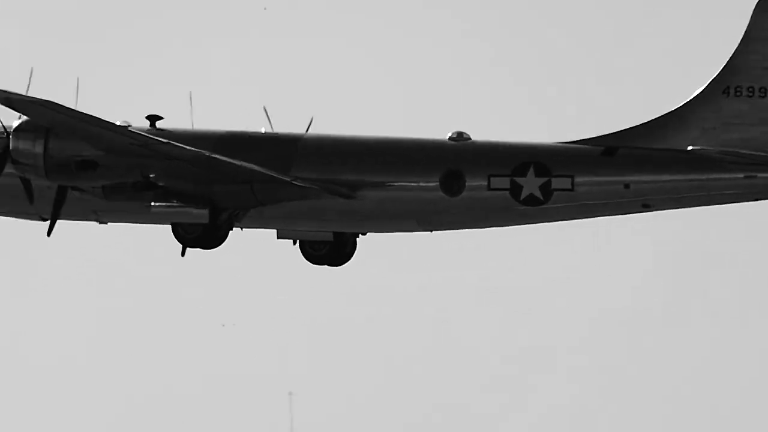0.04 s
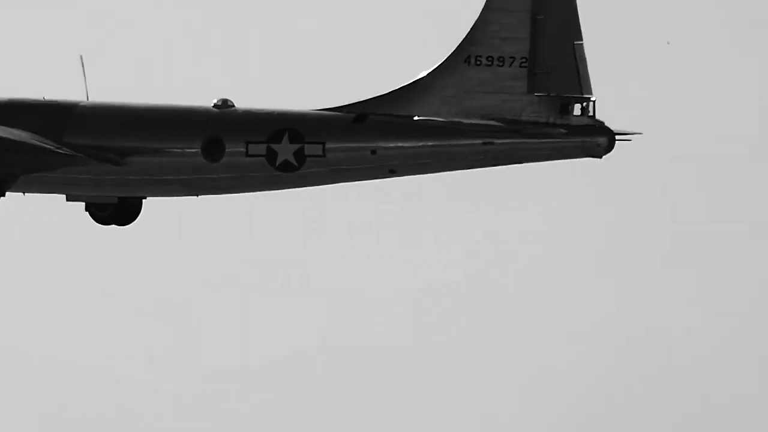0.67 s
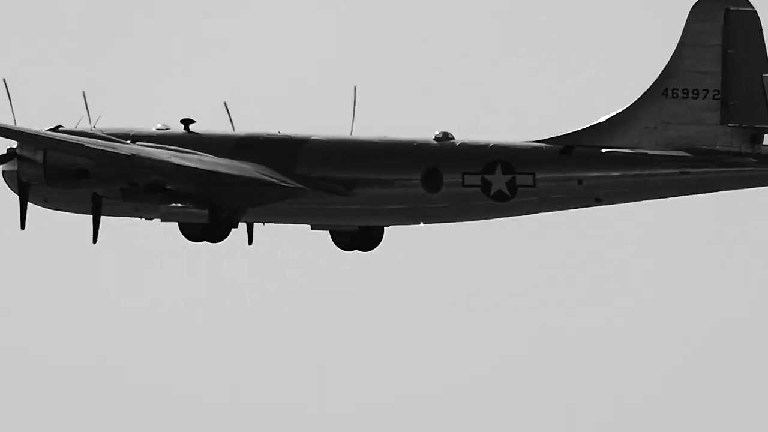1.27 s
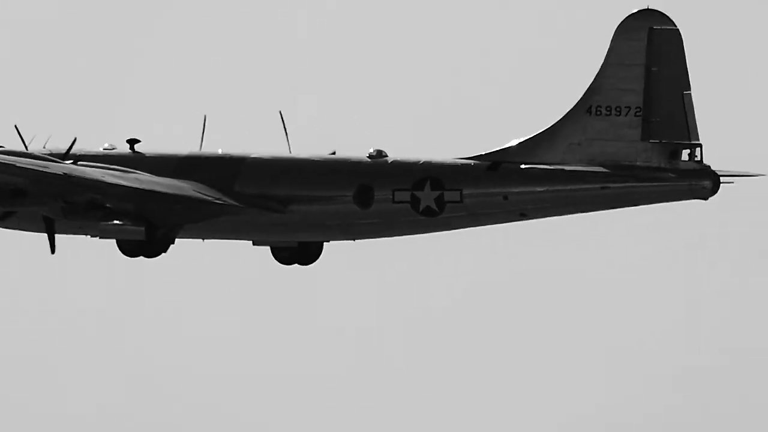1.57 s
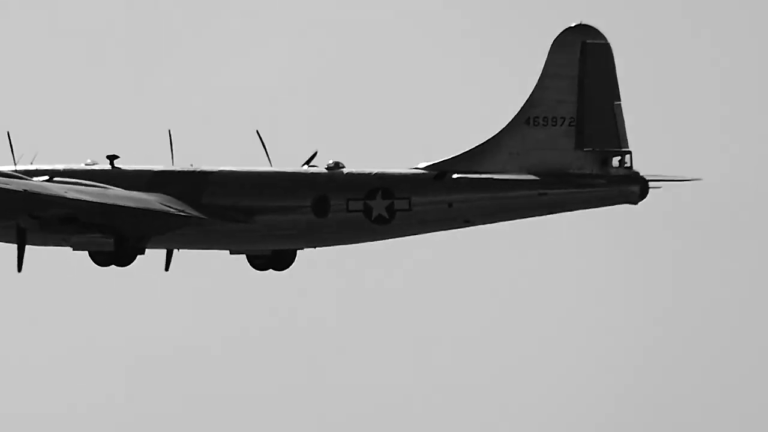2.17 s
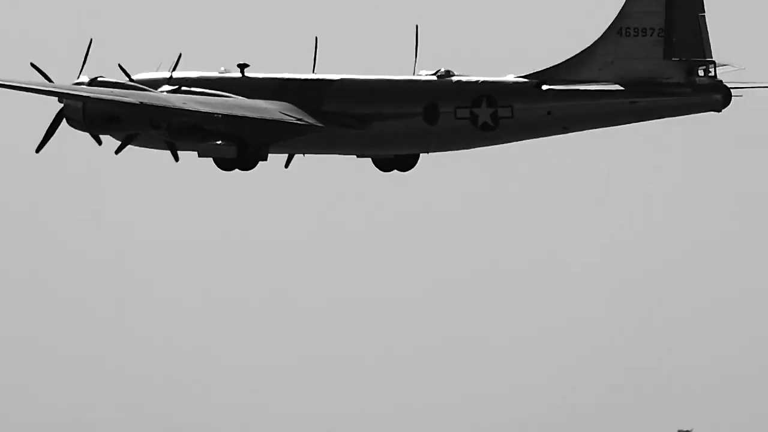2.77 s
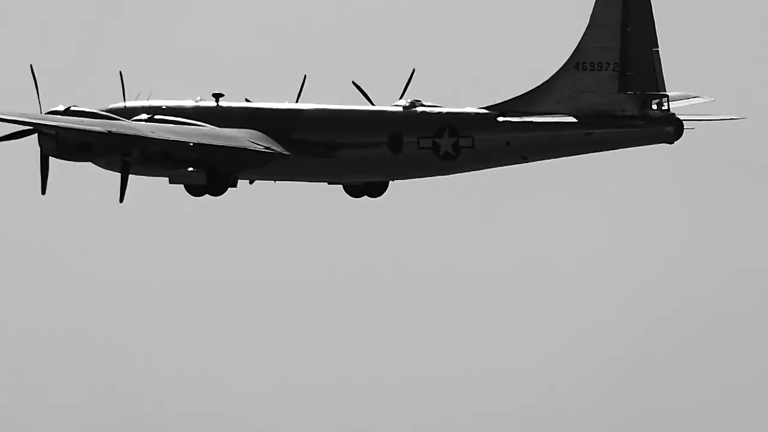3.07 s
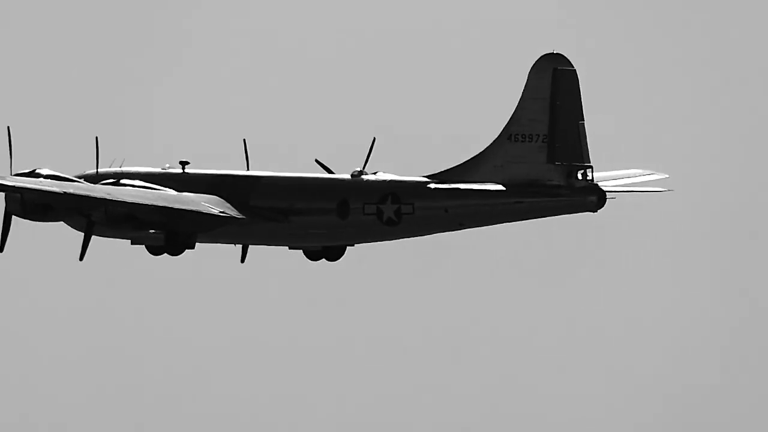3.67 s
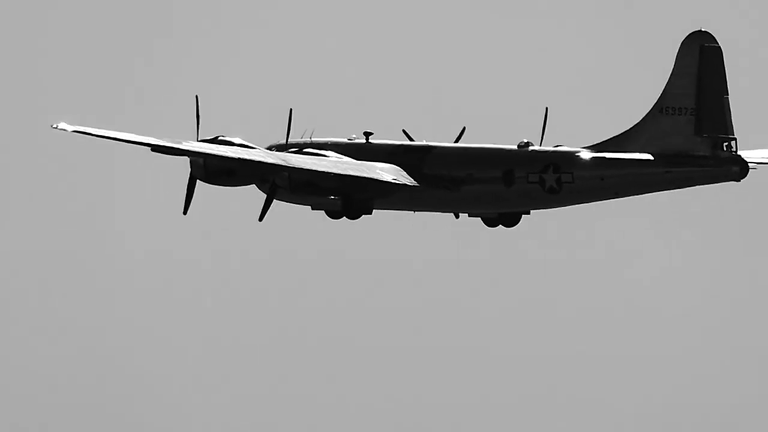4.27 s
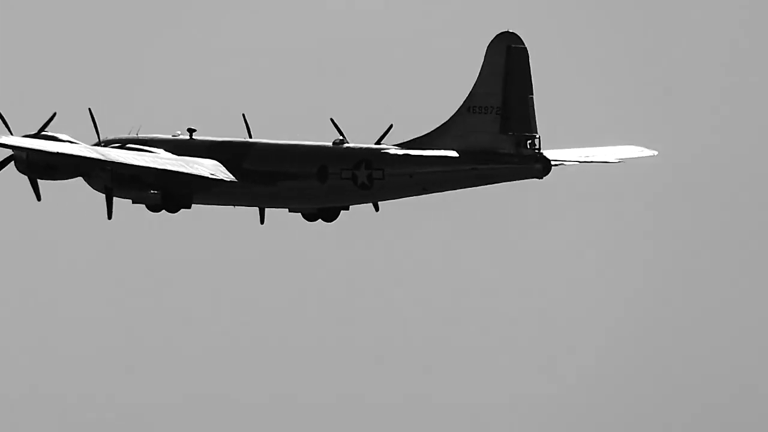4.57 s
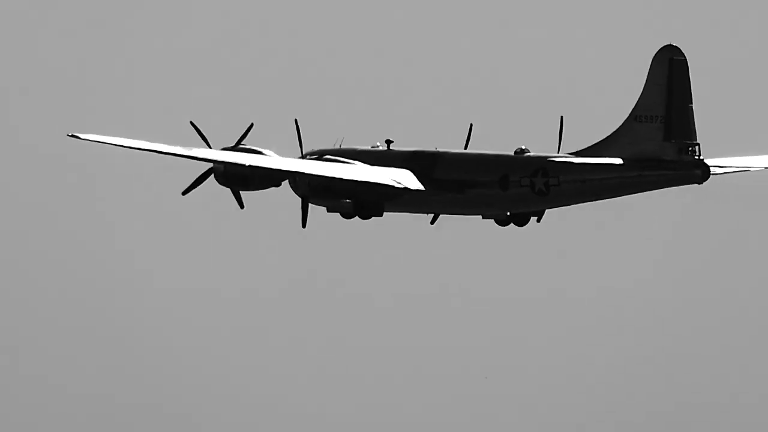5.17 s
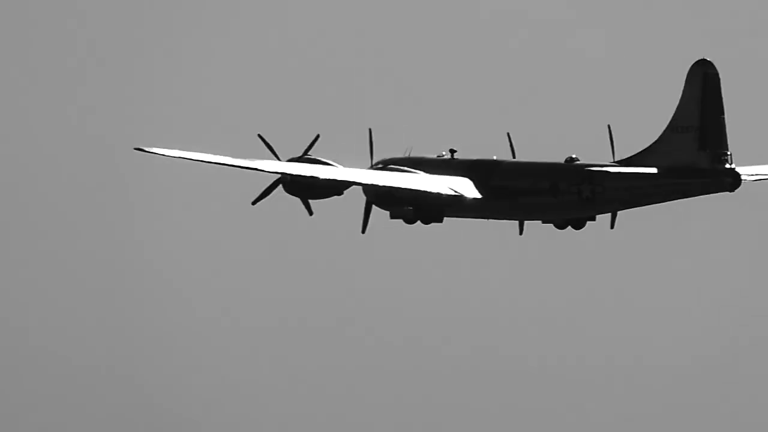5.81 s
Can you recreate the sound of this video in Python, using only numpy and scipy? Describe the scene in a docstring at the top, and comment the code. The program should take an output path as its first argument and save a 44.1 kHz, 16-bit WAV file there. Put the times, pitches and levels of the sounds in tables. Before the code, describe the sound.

A four-engined propeller bomber climbs past outdoors at an airport. Its piston engines throb and crackle while the propellers drone and beat against each other, the pitch sinking slowly throughout. Harder exhaust pops cluster in the first two seconds and return near the end. From about halfway, wind rumbles lightly on the stereo microphone. A faint hiss and a few tiny ticks sit close by.

```python
"""A four-engined propeller bomber climbs past, its pitch sinking with the Doppler shift.
The radial engines throb and crackle: each cylinder fires a pop and a puff of gas through its exhaust pipe.
The propellers drone and beat against each other, and the moving air makes the sound swell and fade.
Wind buffets a two-port stereo microphone; a faint hiss and a few ticks sound close by."""
import sys
import numpy as np
from scipy import signal
from scipy.fft import rfft, irfft
from scipy.io import wavfile
from scipy.ndimage import uniform_filter1d

SR = 44100
rng = np.random.default_rng(int(sys.argv[2]) if len(sys.argv) > 2 else 0)


def output_pcm(signal):
    """Save a mono or channel-first signal as 16-bit PCM at the path in sys.argv[1].

    Samples are clipped to [-1, 1] before scaling.
    """
    pcm = np.clip(np.atleast_2d(signal).T, -1, 1) * 32767
    wavfile.write(sys.argv[1], SR, np.round(pcm).astype(np.int16))


N = 266571
TIME = np.arange(N) / SR
FREQS = np.fft.rfftfreq(N, 1 / SR)
BLADES_PER_CYCLE, CYLINDERS, ENGINES = 3.5, 18, 4
SIDE_GAIN = .67  # stereo width of close sounds
# Nearest engine, running slightly slow. Each row: time in s, lag in cycles, hard-firing gain in dB.
NEAR_ENGINE = [(0, .89, -4.5), (.8, .9, -3), (1.2, .925, -7), (1.6, .95, -7), (2.05, 1.01, -5),
               (2.8, 1.1, -3), (3.4, 1.19, -3), (4, 1.29, -4), (4.7, 1.39, -7), (5.4, 1.44, -6.5),
               (6.04, 1.47, -4.5)]


def amp(db):
    """Decibels to gain."""
    return 10 ** (np.asarray(db) / 20)


def unit(x):
    """Scale to rms 1."""
    return x / np.sqrt(np.mean(x ** 2) + 1e-20)


def curves(rows):
    """Columns of a time table, per sample."""
    s, *columns = np.transpose(rows)
    return [np.interp(TIME, s, c) for c in columns]


def spectra(rows):
    """Columns of a frequency table, per bin."""
    hz, *columns = np.transpose(rows)
    return [np.interp(np.log(FREQS + 1), np.log(hz), c) for c in columns]


def filtered(x, gain):
    """Apply one gain per bin."""
    return irfft(rfft(x) * gain, N)


def causal(db):
    """Minimum-phase response: a sharp start, then ringing."""
    cepstrum = irfft(db * np.log(10) / 20, 2 * len(db) - 1)
    fold = 1 + np.sign(np.fft.fftfreq(len(cepstrum)))
    return np.exp(rfft(cepstrum * fold))


def bump(hz, half_width_hz):
    """Resonance curve of height 1."""
    return 1 / (1 + ((FREQS - hz) / half_width_hz) ** 2)


def noise(gain):
    """Coloured noise of rms 1."""
    return unit(filtered(rng.standard_normal(N), gain))


def wander(rate_hz):
    """Slow random drift of rms 1."""
    return noise(np.exp(-(FREQS / rate_hz) ** 2) * (FREQS > 0))


def wide_noise(gain):
    """Coloured noise, partly different in each channel."""
    mid, side = noise(gain), noise(gain)
    return mid + SIDE_GAIN * np.array([side, -side])


def hiss():
    """Faint, wide hiss."""
    levels = [(0, -79.5), (2.5, -79), (4.8, -77), (5.3, -75), (5.6, -75.5), (6.04, -76.5)]  # Each row: time in s, level in dB.
    colour = [(2000, 0), (4000, 1), (6800, -4.5), (7500, -10.5), (8500, -8.5), (9700, 0), (11000, -4.5),
              (15000, -7)]  # Each row: frequency in Hz, gain in dB.
    return amp(curves(levels)[0]) * wide_noise(amp(spectra(colour)[0]))


def ticks(gain_db=1, ring_db=10, half_width_hz=150):
    """Tiny ticks and scuffs close by: noise bursts, each with a short ring."""
    # Each row: start in s, level in dB, rise in s, decay in s, dulling above 3 kHz in dB/octave,
    # ring in Hz, left minus right in dB.
    events = [(.295, -62, .012, .018, 24, 3300, 0), (.355, -60, .012, .02, 28, 3500, 0),
              (.563, -65, .006, .012, 20, 3520, 0), (.765, -60, .015, .02, 22, 3200, 0),
              (.793, -65, .022, .016, 6, 5480, 1), (1.945, -66, .005, .011, 8, 5070, 2),
              (2.2725, -44.5, .0003, .0014, .5, 12500, 3), (2.273, -63, .002, .011, 0, 6460, 3),
              (3.031, -66, .002, .005, 9, 5200, 0), (3.91, -65, .008, .014, 19.5, 3400, 0),
              (4.17, -68, .02, .035, 12.5, 3290, 0), (4.98, -73, .025, .015, 6, 5300, 0),
              (5.25, -71, .025, .04, 7, 9900, 0), (5.315, -71, .015, .025, 2.5, 5400, 0),
              (5.802, -60.5, .004, .008, 9, 4900, 1)]
    colour = [(1500, -28), (3000, 3.5), (4600, -4.5), (5500, -5), (6500, -2.5), (8300, -19.5), (9800, -0.5),
              (11500, -11), (13000, -6), (16000, -22)]  # Each row: frequency in Hz, gain in dB.
    octaves = np.log2(np.maximum(FREQS / 3000, 1))
    out = np.zeros((2, N))
    for start_s, db, rise_s, decay_s, dull_db, ring_hz, pan_db in events:
        colour_db = spectra(colour)[0] + ring_db * bump(ring_hz, half_width_hz) - dull_db * octaves
        burst = wide_noise(amp(colour_db)) * amp([[pan_db / 2], [-pan_db / 2]])
        attack = np.clip((TIME - start_s) / rise_s, 0, 1)
        decay = np.exp(-np.maximum(TIME - start_s - rise_s, 0) / decay_s)
        out += amp(db + gain_db) * burst * attack * decay
    return out


def wind():
    """Low rumble of air buffeting the microphone."""
    levels = [(0, -51.5), (2.7, -49.5), (3.05, -35.5), (3.35, -39.5), (3.65, -32.5), (3.95, -37.5),
              (6.04, -44.5)]  # Each row: time in s, level in dB.
    colour = [(20, -21), (40, -17.5), (85, -1), (140, 9), (220, -13), (400, -31), (1000, -70.5)]  # Each row: frequency in Hz, gain in dB.
    return amp(curves(levels)[0]) * noise(amp(spectra(colour)[0]))


def ports(direct, scatter_s=.05):
    """Two close ports hear the direct sound out of phase, and its scatter differently."""
    # Each row: frequency in Hz, left minus right in dB, left lead in rad, coherence 0-1.
    response = [(60, -.4, 0.1, .98), (130, -.6, 0.1, .99), (200, -0.8, 0.15, 0.98), (396, -4, 0.55, 1),
                (710, -4.5, 0.7, 0.74), (950, -7.5, 1.3, 1), (1240, 1.5, 1.34, 1), (1430, 4, 1, 0.52),
                (1670, 0, 0.096, 1), (1880, 1, .9, 0.7), (2200, -1, .8, .8), (3100, -1, 1.4, .85),
                (4500, 6, .1, 0.45), (10000, 0.5, -2.2, 0.28)]
    balance_db, lead_rad, coherence = spectra(response)
    direct = direct * signal.windows.tukey(N, .002)
    echoes = rfft(rng.standard_normal(N) * np.exp(-TIME / scatter_s))
    shared = np.sqrt((1 + coherence) / 2)
    scatter = np.sqrt((1 - coherence) / 2) * echoes / (abs(echoes) + 1e-12)
    pan = amp(balance_db / 2) * np.exp(.5j * lead_rad)
    left = filtered(direct, (shared + scatter) * pan)
    right = filtered(direct, (shared - scatter) / pan)
    return np.array([left, right])


def band_pan(pair, centre_hz=880, half_width_hz=210):
    """One middle band swings between left and right."""
    lean = [(0, 0), (.3, -6.5), (.6, 5), (.78, -7.5), (.95, 2.5), (1.2, -6), (2.1, -2), (2.45, 3),
            (2.85, -3), (3.1, 8), (3.4, -3), (3.7, 3.5), (4.2, 5.5), (5.15, 6), (5.35, 3), (5.7, 1.5),
            (6.04, -1)]  # Each row: time in s, leftward lean in dB before the channel weights.
    lean_db = curves(lean)[0]
    window = np.exp(-((FREQS - centre_hz) / half_width_hz) ** 2)
    band = np.array([filtered(x, window) for x in pair])
    return pair + band * (amp([.6 * lean_db, -.3 * lean_db]) - 1)


def cycles():
    """Engine cycles elapsed, two crank turns each."""
    rates = [(0, 19.3), (.8, 18.88), (1.5, 18.63), (2.4, 18.53), (3.3, 18.28), (4.2, 17.87), (5, 17.76),
             (6.04, 17.58)]  # Each row: time in s, Doppler-shifted cycle rate in Hz.
    return np.cumsum(curves(rates)[0]) / SR


def near_cycles():
    """Cycles elapsed for the nearest engine."""
    return cycles() - curves(NEAR_ENGINE)[0]


def tone(order, levels, drift_rad, drift_hz, halo_gain=.07, halo_hz=22):
    """A wavering multiple of the cycle rate, with a halo of scattered sound."""
    phase = 2 * np.pi * (order * cycles() + rng.random()) + order * drift_rad * wander(drift_hz)
    halo = wander(halo_hz) * np.cos(phase) + wander(halo_hz) * np.sin(phase)
    return amp(curves(levels)[0]) * (np.sqrt(2) * np.cos(phase) + halo_gain * halo)


def boom_level_db():
    """Level curve of the exhaust's low boom."""
    levels = [(0.0, -24.5), (0.18, -25), (0.3, -31), (0.84, -30.5), (1.31, -32), (1.93, -29), (2.22, -30),
              (2.43, -30.5), (3.16, -29), (3.56, -27.5), (3.74, -28), (4.28, -29), (4.42, -29.5),
              (4.7, -24.5), (4.81, -24.5), (4.92, -28.5), (5.12, -33), (5.37, -25.5), (5.88, -28),
              (6.04, -24.5)]  # Each row: time in s, level in dB.
    return curves(levels)[0]


def weak_tones(gain_db=-4, fade_db=3.5, fade_hz=5.3, drift_rad=.07, drift_hz=3, follow=.71):
    """Unequal cylinders sound cycle harmonics; those near the firing rate swell with the boom."""
    # Each row: multiple of the cycle rate, then level in dB approaching, abreast and leaving.
    orders = [(3, -55, -52, -59), (5, -51, -53, -52), (6, -49, -49, -44), (8, -48, -41, -39),
              (10, -48, -46, -43), (11, -42, -40, -44), (12, -50, -40, -42), (13, -48, -43, -42),
              (15, -42, -44, -41), (17, -45, -46, -44), (18, -41, -41, -41), (20, -39, -45, -42),
              (22, -43, -44, -40), (23, -41, -44, -39), (24, -45, -47, -45), (25, -42, -46, -46),
              (26, -47, -51, -47)]
    aspect_s = [0.48, 3.9, 5.3]  # Times in s: approaching, abreast, leaving.
    cycle_rad, boom_db = 2 * np.pi * cycles(), boom_level_db()
    out = np.zeros(N)
    for order, *aspect_db in orders:
        swell_db = follow * (boom_db - boom_db.mean()) * np.exp(-((order - CYLINDERS) / 10) ** 2)
        level_db = np.interp(TIME, aspect_s, aspect_db) + swell_db + fade_db * wander(fade_hz)
        phase = order * (cycle_rad + drift_rad * wander(drift_hz)) + 2 * np.pi * rng.random()
        out += amp(level_db) * np.sqrt(2) * np.cos(phase)
    return amp(gain_db) * out


def strong_tones(gain_db=1.5):
    """Four exhaust harmonics that stand clear of the roar."""
    # Each row: time in s, level in dB.
    order_4 = [(0.0, -46.5), (1.3, -46.5), (1.96, -47.5), (2.4, -60), (2.87, -44), (3.3, -63.5),
               (6.04, -59)]
    order_9 = [(0.0, -39.5), (0.76, -47.5), (1.02, -38.5), (1.45, -40.5), (1.71, -35), (2.25, -45.5),
               (2.58, -51), (3.38, -32), (4.03, -41.5), (4.21, -37), (5.19, -39.5), (5.63, -27.5),
               (6.04, -48)]
    order_16 = [(0.0, -37.5), (0.73, -39), (0.84, -37.5), (1.09, -44.5), (1.89, -47), (2.51, -32.5),
                (2.72, -43.5), (3.2, -34.5), (3.34, -40.5), (4.65, -36), (4.83, -44.5), (5.08, -30),
                (5.73, -53.5), (6.04, -36.5)]
    order_21 = [(0.0, -41), (1.45, -44.5), (1.56, -48), (1.85, -41), (2.58, -37.5), (2.9, -45.5),
                (3.52, -66.5), (3.99, -30.5), (4.46, -55), (5.01, -34.5), (6.04, -42)]
    orders = [(4, order_4), (9, order_9), (16, order_16), (21, order_21)]
    return amp(gain_db) * sum(tone(k, levels, drift_rad=.045, drift_hz=1.4) for k, levels in orders)


def pop_spectrum_db():
    """One exhaust pop, with the narrow dips of the microphone housing."""
    colour = [(60, -27), (150, -2), (240, -3.5), (330, 0.5), (440, 2), (540, -6), (700, -4), (1050, -6),
              (1600, -12.5), (1950, -23), (2300, -26.5), (3300, -44.5), (4100, -67.5), (7000, -99)]  # Each row: frequency in Hz, gain in dB.
    dips = [(576.7, 8.8, -12.5), (878, 25, -7.5), (2652, 150, -12)]  # Each row: centre in Hz, half width in Hz, gain in dB.
    return spectra(colour)[0] + sum(db * bump(hz, half_width_hz) for hz, half_width_hz, db in dips)


def cracks(gain_db=1.5, ring_db=9.5, half_width_hz=170, echo_gain=.25, echo_s=.0032):
    """Single hard firings ring briefly, rounded off by distance and doubled by the ground."""
    events = [(.03, -19, 750), (.083, -17, 950), (.149, -16, 1050), (.242, -16.5, 1000),
              (.289, -16.5, 1100), (1.098, -16.5, 985), (1.151, -16, 1100), (1.163, -17.5, 780),
              (1.19, -17, 980), (1.206, -16, 1000), (1.259, -13.5, 740), (1.313, -17.5, 990),
              (1.351, -16.5, 805), (1.367, -14, 1010), (1.419, -20, 1000), (1.526, -16, 1100),
              (1.563, -18, 1140), (1.581, -9.5, 1030), (1.62, -18, 1080), (1.635, -15, 1050),
              (1.688, -18, 1060), (1.744, -15, 1130), (1.797, -19, 1000), (2.015, -13.5, 1000),
              (2.122, -16, 1010), (2.491, -16, 1230), (2.546, -19, 770), (2.56, -18, 1300),
              (2.778, -19, 780), (2.906, -18, 1170), (3.257, -19.5, 900), (4.783, -17, 730),
              (4.931, -20, 730), (5.168, -20, 720), (5.347, -16, 750), (5.387, -18, 800),
              (5.465, -17, 1200)]  # Each row: start in s, peak in dB before gain_db, ring in Hz.
    band_db = -20 * np.log10(1 + (600 / (FREQS + 20)) ** 2 + np.minimum(FREQS / 2000, 2) ** 6)
    colour_db = pop_spectrum_db() + band_db
    out = np.zeros(N)
    for start_s, peak_db, ring_hz in events:
        crack_db = colour_db + ring_db * bump(ring_hz, half_width_hz)
        crack = irfft(causal(crack_db[::128]))  # coarse bins give a short response
        out[round(start_s * SR):][:len(crack)] += amp(peak_db + gain_db) * crack / abs(crack).max()
    return out + echo_gain * np.interp(TIME - echo_s, TIME, out)


def hard_firings(spread_db=3, jitter_s=.0015):
    """Two cylinders of the nearest engine bang once a cycle each, never quite on time."""
    cylinders = [(0, 0), (-.27, -3.5)]  # Each row: offset in cycles, level in dB.
    out = np.zeros(N)
    for offset, db in cylinders:
        due = np.flatnonzero(np.diff(np.floor(near_cycles() - offset)))
        late, size = np.clip(rng.standard_normal((2, len(due))), -2, 1.2)
        at = np.clip(due + (late * jitter_s * SR).astype(int), 0, N - 1)
        out[at] += amp(db + spread_db * size)
    return out * amp(curves(NEAR_ENGINE)[1])


def firings(detune, uneven_db=3, spread_db=2.5, stagger=.22, jitter=.04, sway_cycles=.02979):
    """One engine's pops: each cylinder has its own strength and pipe length, and every shot varies."""
    elapsed = cycles() * (1 + detune) + sway_cycles * wander(1.5)
    shot = np.arange(2200)
    cylinder = shot % CYLINDERS
    rank = np.linspace(-1, 1, CYLINDERS)
    strength_db = rng.permutation(rank ** 3 + rank) * uneven_db
    late = stagger * rng.standard_normal(CYLINDERS)[cylinder]  # in firing intervals
    late += jitter * rng.standard_normal(len(shot))
    size = amp(strength_db[cylinder] + spread_db * rng.standard_normal(len(shot)))
    at = np.searchsorted(elapsed, (shot + late + rng.random()) / CYLINDERS)
    heard = (at > 0) & (at < N)
    return np.bincount(at[heard], size[heard], N)


def pipes(shots, puff_gain=.89, puff_s=.0034):
    """Shots and their turbulent puffs of gas, through the exhaust pipes."""
    envelope = signal.lfilter([1], [1, -np.exp(-1 / (puff_s * SR))], shots)
    puffs = envelope * rng.standard_normal(N)
    return filtered(unit(shots) + puff_gain * unit(puffs), causal(pop_spectrum_db()))


def focused(x, centre_hz, share, width_hz):
    """Send a share of the sound through a moving resonance, keeping the level even."""
    carrier = np.exp(2j * np.pi * np.cumsum(centre_hz) / SR)
    pole = np.exp(-np.pi * width_hz / SR)
    ring = (carrier * signal.lfilter([1 - pole], [1, -pole], x / carrier)).real
    mix = (1 - share) * unit(x) + share * unit(ring)
    return mix / np.sqrt(uniform_filter1d(mix ** 2, size=SR // 7) + 1e-9)


def exhaust_bands(roar, throbbing, flutter_db=.8, flutter_hz=5):
    """Six bands swell and fade in the moving air; resonances shift as the aircraft's aspect changes."""
    growl_track = [(0, -25, 311.3), (.28, -34.5, 323), (.45, -27, 315), (.65, -29, 343), (.75, -21, 377),
                   (.88, -22.5, 389), (1.05, -27, 406), (1.27, -33, 400), (1.5, -30.5, 378),
                   (1.75, -32.5, 380.4), (1.95, -30, 394), (2.2, -34, 399.6), (2.47, -27, 411),
                   (2.7, -31, 410), (2.95, -27.5, 408), (3.3, -30.5, 342), (3.55, -25.5, 460),
                   (3.77, -31, 392), (4, -30.5, 385.4), (4.27, -29, 405.5), (4.42, -37.5, 359.4),
                   (4.68, -32, 332.4), (4.78, -28, 401), (5.03, -25, 393), (5.2, -31, 397),
                   (5.4, -22.5, 381), (5.6, -26.5, 368), (5.88, -33, 372), (6.04, -26.5, 370)]  # Each row: time in s, level in dB, resonance in Hz.
    # Each row: time in s, resonance in Hz, share 0-1.
    bark_focus = [(0, 710, 0.2), (0.701, 702, 0), (2, 690, 0), (2.501, 770, 0.3), (4.5, 690, .15),
                  (4.9, 715, 0.3), (5.2, 695, 0.1), (5.45, 675, 0.3), (6.04, 699, 0.4)]
    crackle_focus = [(0, 1070, 0.11), (.35, 1020, 0.28), (.65, 1400, .15), (.95, 1043, .05),
                     (1.2, 1054, 0.2), (1.65, 1061, .35), (2.1, 1060, .35), (2.351, 1135, 0.43),
                     (2.65, 1330, .3), (2.8, 1030, 0.095), (3.1, 1076, 0.45), (3.5, 1024, .1),
                     (4.3, 1093, 0.17), (4.75, 1760, 0.15), (5.2, 1466, 0.043), (5.599, 1490, 0.075),
                     (6.04, 1517, 0.1)]
    # Each row: time in s, level in dB.
    bark_levels = [(0.0, -33.5), (0.15, -28.5), (0.66, -37.5), (1.16, -31.5), (1.45, -37.5), (1.6, -36),
                   (1.851, -37.5), (2.0, -36.5), (2.32, -41.5), (2.51, -35), (2.65, -40), (2.801, -36),
                   (3.16, -41), (3.229, -35), (3.41, -33), (3.78, -41), (3.92, -36), (4.39, -36.5),
                   (4.5, -41), (4.79, -31.5), (5.08, -34), (5.34, -31), (6.04, -32)]
    crackle_levels = [(0.0, -35), (0.149, -33.5), (0.33, -33), (0.472, -33.5), (0.95, -35.5), (1.13, -30.5),
                      (1.45, -31.5), (1.601, -29.5), (1.96, -36.5), (2.029, -29.5), (2.179, -36),
                      (2.58, -32.5), (2.69, -37), (2.871, -30.5), (2.94, -31), (3.05, -38.5), (3.16, -40.5),
                      (3.449, -32.5), (3.56, -39), (3.81, -42.5), (3.921, -35), (4.07, -38), (4.36, -40.5),
                      (4.62, -40.5), (4.79, -36.5), (5.0, -38.5), (5.24, -39.5), (5.34, -36), (5.46, -30),
                      (5.6, -35), (5.81, -38.5), (6.04, -36.5)]
    rasp_levels = [(0.0, -51.5), (0.37, -47), (0.44, -57), (0.58, -60), (0.84, -50), (1.24, -57),
                   (1.34, -46.5), (1.45, -58.5), (1.56, -50.0), (1.85, -60), (1.93, -53), (2.43, -55.5),
                   (2.51, -49.5), (2.69, -58), (2.9, -49.0), (3.05, -57), (3.45, -56), (3.78, -60.5),
                   (3.96, -57), (4.1, -60.5), (4.61, -63.5), (4.79, -55), (5.05, -62.5), (5.52, -54.5),
                   (5.73, -66), (6.04, -60.5)]
    edge_levels = [(0.0, -66.5), (0.4, -64.5), (0.66, -69.5), (0.84, -65), (1.82, -74), (2.29, -72.5),
                   (3.78, -76), (3.96, -74), (4.03, -78.5), (5.15, -80), (5.34, -76.5), (6.04, -77.5)]  # fades with distance
    lowpasses = [1 / (1 + (FREQS / hz) ** 16) for hz in (295, 510, 880, 1900, 2650)]
    bands = np.diff(lowpasses, axis=0, prepend=0, append=1)
    feeds = (roar, roar, throbbing, throbbing, throbbing, roar)
    boom, growl, bark, crackle, rasp, edge = (unit(filtered(x, band)) for x, band in zip(feeds, bands))
    growl_db, growl_hz = curves(growl_track)
    layers = [(boom, boom_level_db() - 5),
              (focused(growl, growl_hz, share=.45, width_hz=80), growl_db - 3),
              (focused(bark, *curves(bark_focus), width_hz=190), curves(bark_levels)[0]),
              (focused(crackle, *curves(crackle_focus), width_hz=200), curves(crackle_levels)[0] + .6),
              (rasp, curves(rasp_levels)[0] + 1),
              (edge, curves(edge_levels)[0] + 2)]
    return sum(amp(db + flutter_db * wander(flutter_hz)) * layer for layer, db in layers)


def exhaust(shadow_db=2, hard_gain=14, echo_gain=.3, echo_s=.003, wobble_s=.0003):
    """Four engines pop, the far ones shaded by the fuselage; the nearest sets the midrange throb."""
    throb_depth = [(0, 1), (.9, 1), (1.15, 2), (1.8, 2), (2.3, 1.2), (6.04, 1)]  # Each row: time in s, peak swing in dB.
    detunes = (0, -.004, .004, -.008)
    pops = unit(sum(amp(-shadow_db * e) * firings(detunes[e]) for e in range(ENGINES)))
    roar = pipes(pops)
    throb_db = curves(throb_depth)[0] * np.cos(2 * np.pi * near_cycles() + 1.1)
    throbbing = pipes(pops * amp(throb_db) + hard_gain * hard_firings())
    # The ground echo crosses moving air, so its comb drifts.
    echo = np.interp(TIME - echo_s - wobble_s * wander(2.05), TIME, throbbing)
    return exhaust_bands(roar, throbbing + echo_gain * echo)


def propellers():
    """Four blade-rate harmonics, swelling and fading as the propellers pass in and out of step."""
    # Each row: time in s, level in dB.
    blade_1 = [(0.0, -45.5), (0.62, -34), (0.84, -36.5), (1.16, -52), (1.34, -39), (1.56, -40), (1.74, -48),
               (2.47, -36), (3.12, -46), (3.27, -43), (3.56, -47.5), (3.96, -37), (4.72, -40.5),
               (5.05, -54.5), (5.3, -54), (5.44, -58.5), (6.04, -44.5)]
    blade_2 = [(0.0, -27.5), (0.259, -23), (0.759, -40.5), (1.05, -25.5), (1.2, -25), (1.451, -35.5),
               (2.031, -24), (2.18, -31.5), (2.32, -50), (2.54, -32), (3.12, -31.5), (3.38, -43),
               (3.52, -40), (3.7, -43), (3.779, -38.5), (3.921, -33), (4.07, -35), (4.249, -29.5),
               (4.54, -36), (4.83, -29.5), (5.08, -28.5), (5.23, -45.5), (5.441, -30), (5.84, -24),
               (6.04, -30.5)]
    blade_3 = [(0.0, -47.5), (0.22, -32.5), (0.689, -26), (0.84, -37.5), (1.09, -25), (1.241, -56.5),
               (1.34, -36.5), (1.63, -34), (1.71, -53), (1.89, -30), (2.76, -57.5), (2.871, -37),
               (3.339, -55), (3.451, -31.5), (3.7, -42.5), (5.699, -50.5), (5.92, -44.5), (6.04, -39.5)]
    blade_4 = [(0.0, -27.5), (0.329, -34), (0.87, -27.5), (1.31, -51.5), (1.381, -39.5), (1.561, -48.5),
               (1.71, -30.5), (2.472, -42.5), (2.581, -30.5), (2.9, -36.5), (3.009, -32.5), (3.199, -38),
               (3.3, -37), (3.489, -58.5), (3.74, -31.5), (4.39, -40), (4.5, -54), (4.612, -28),
               (4.829, -50), (5.121, -37.5), (5.341, -50), (5.519, -40.5), (6.04, -34)]
    harmonics = enumerate((blade_1, blade_2, blade_3, blade_4), 1)
    return sum(tone(k * BLADES_PER_CYCLE, levels, drift_rad=.059, drift_hz=2.3)
               for k, levels in harmonics)


def scene():
    """Aircraft and wind through the ports; hiss and ticks stay dry."""
    aircraft = propellers() + strong_tones() + weak_tones() + exhaust() + cracks()
    return hiss() + band_pan(ports(aircraft + wind())) + ticks()


def record(dry):
    """Low-pass at 15.15 kHz."""
    lowpass = signal.firwin(511, 15150, window=("kaiser", 9), fs=SR)
    return signal.oaconvolve(dry, lowpass[None], "same")


dry = scene()
out = record(dry)
output_pcm(out)
```